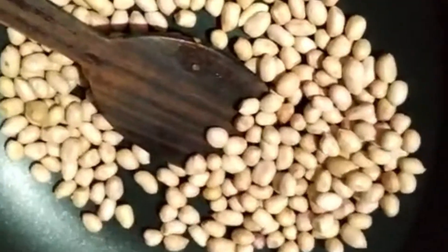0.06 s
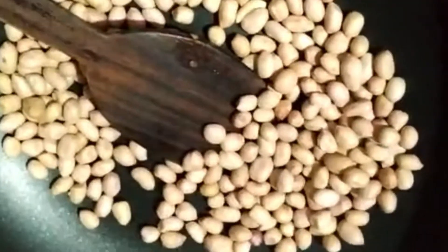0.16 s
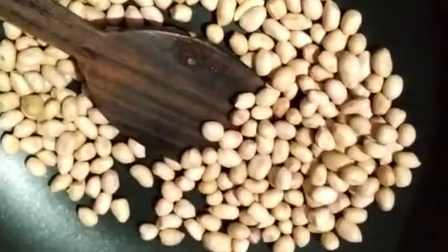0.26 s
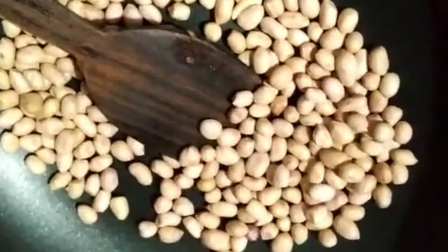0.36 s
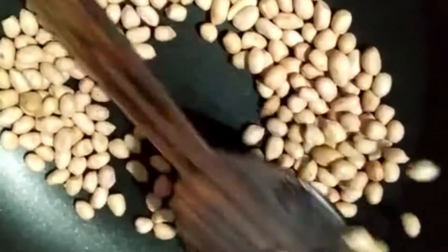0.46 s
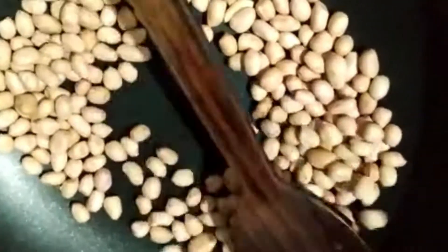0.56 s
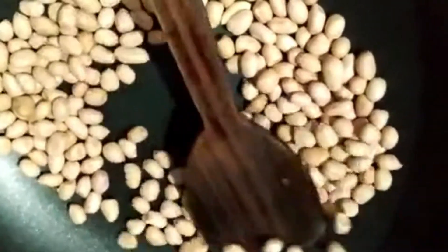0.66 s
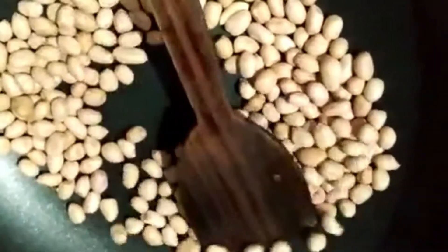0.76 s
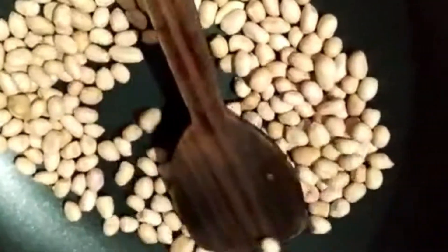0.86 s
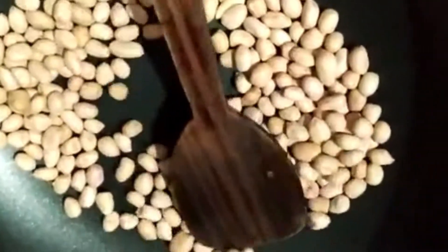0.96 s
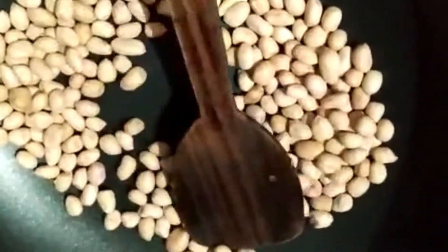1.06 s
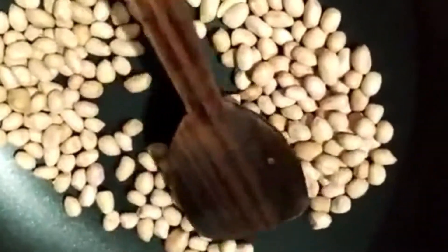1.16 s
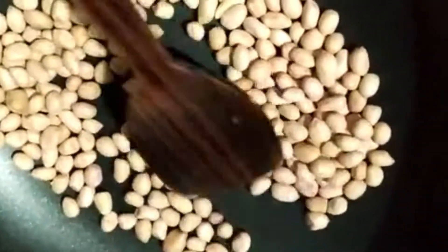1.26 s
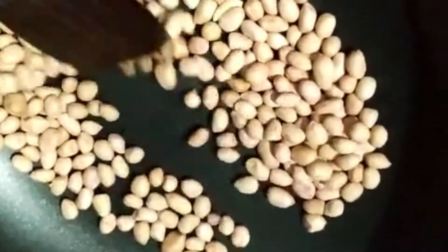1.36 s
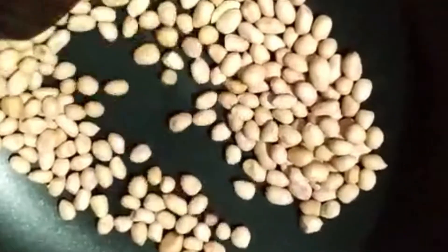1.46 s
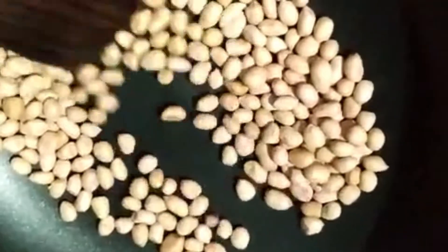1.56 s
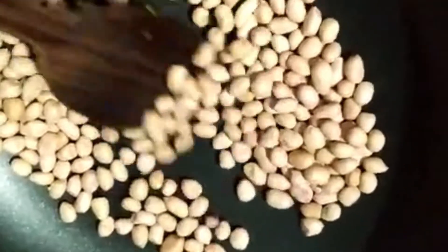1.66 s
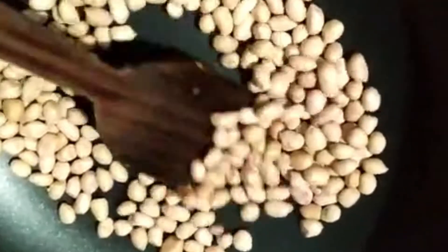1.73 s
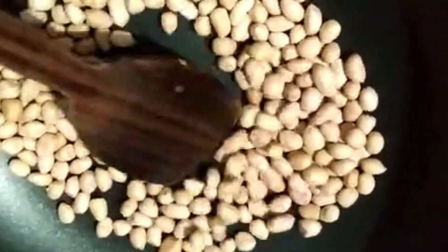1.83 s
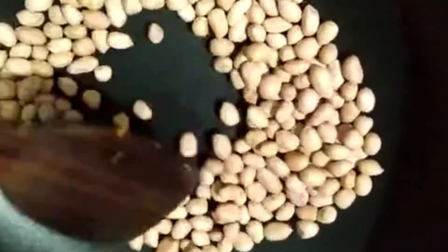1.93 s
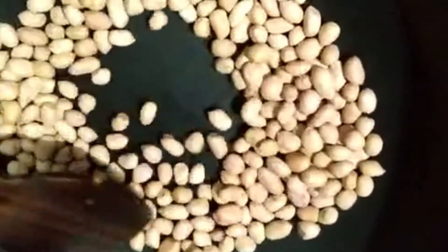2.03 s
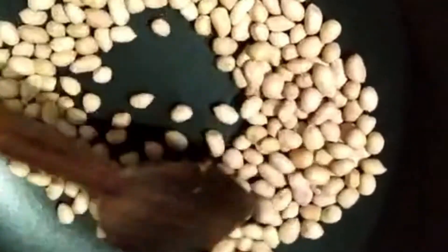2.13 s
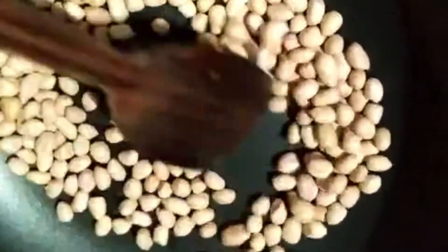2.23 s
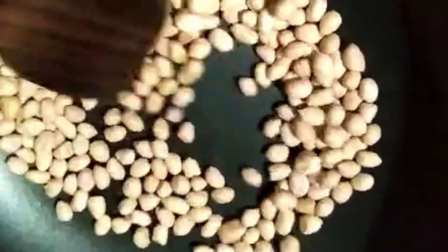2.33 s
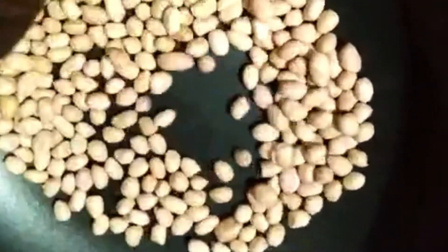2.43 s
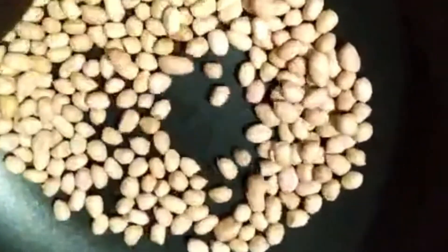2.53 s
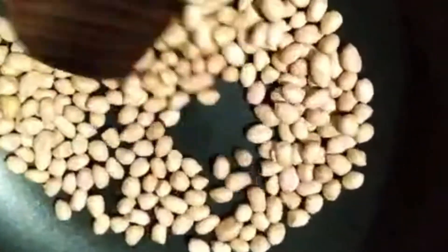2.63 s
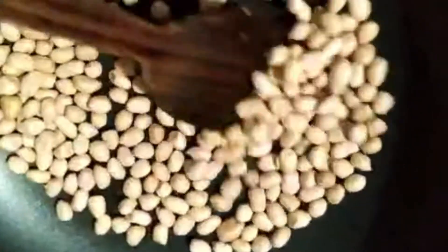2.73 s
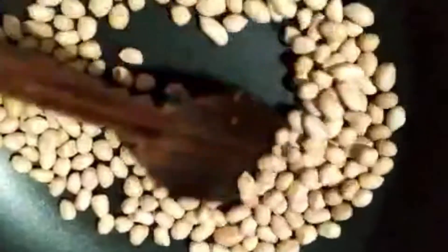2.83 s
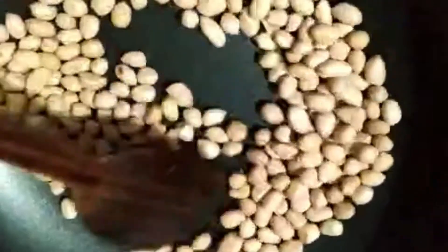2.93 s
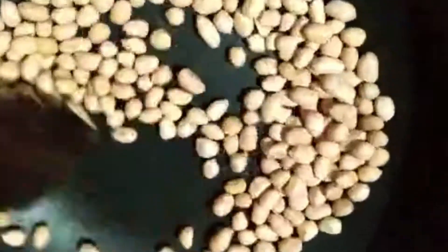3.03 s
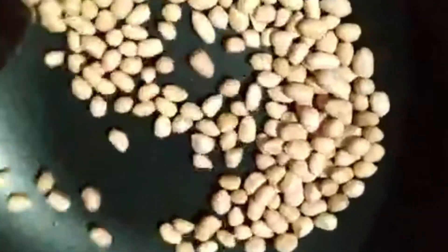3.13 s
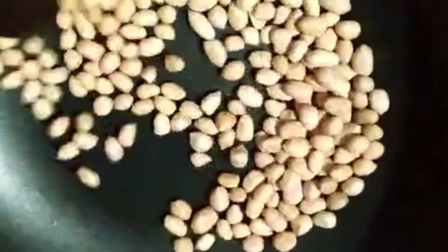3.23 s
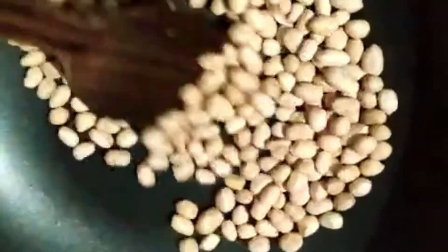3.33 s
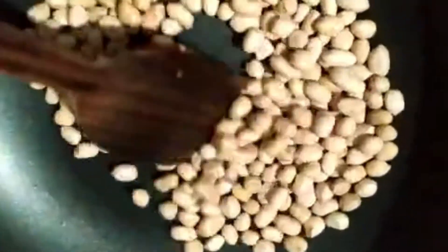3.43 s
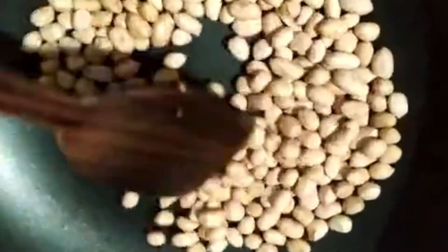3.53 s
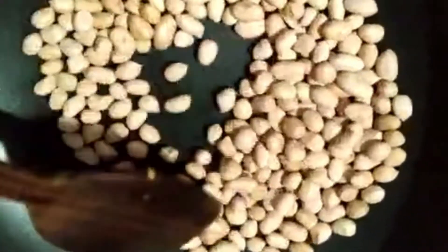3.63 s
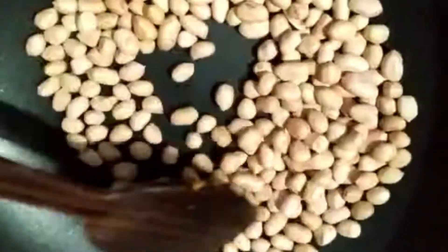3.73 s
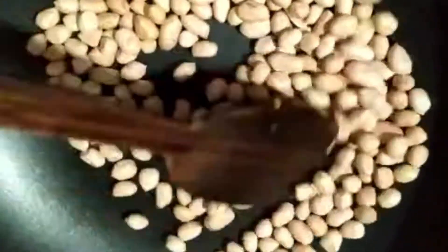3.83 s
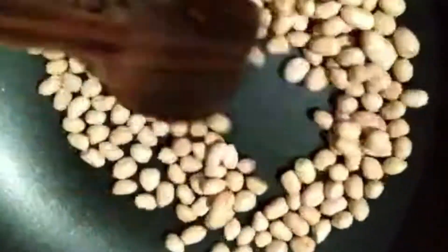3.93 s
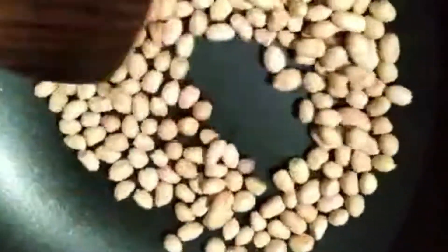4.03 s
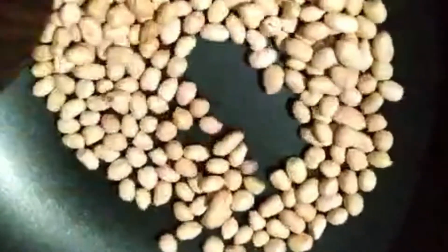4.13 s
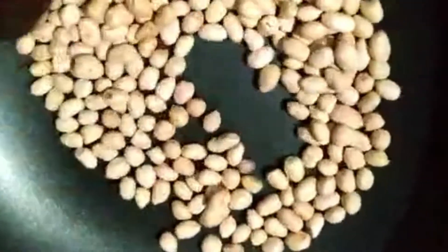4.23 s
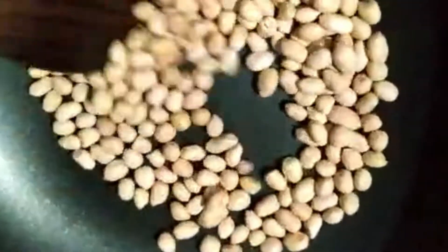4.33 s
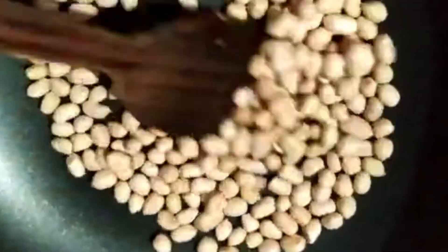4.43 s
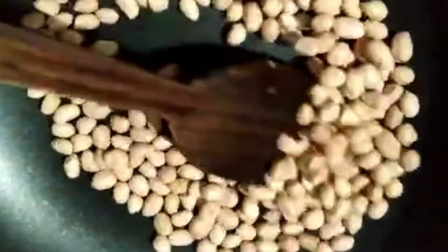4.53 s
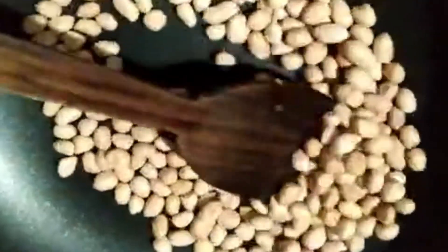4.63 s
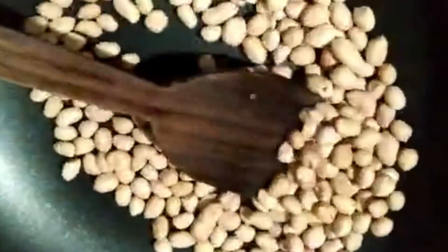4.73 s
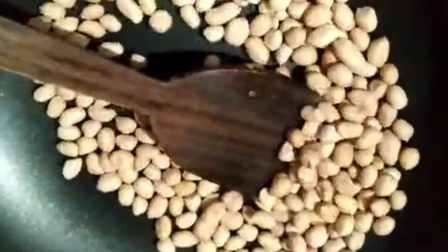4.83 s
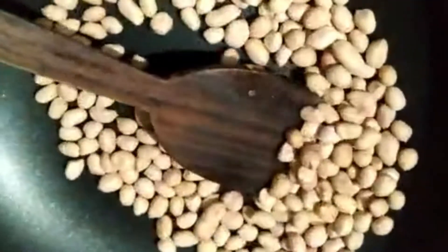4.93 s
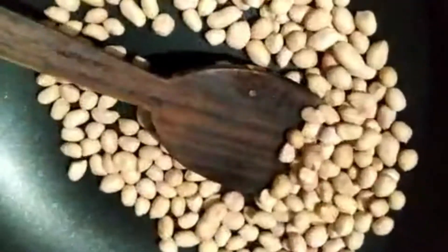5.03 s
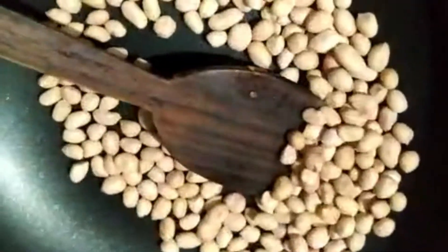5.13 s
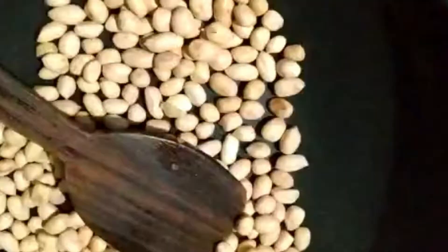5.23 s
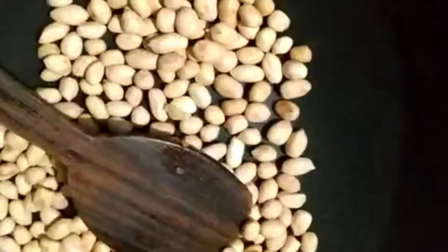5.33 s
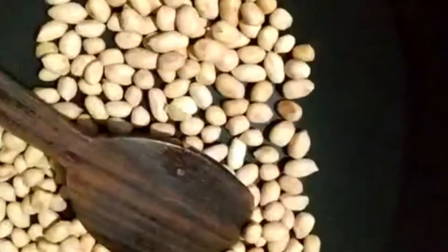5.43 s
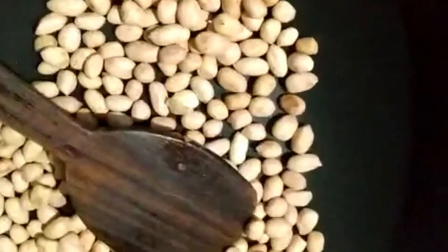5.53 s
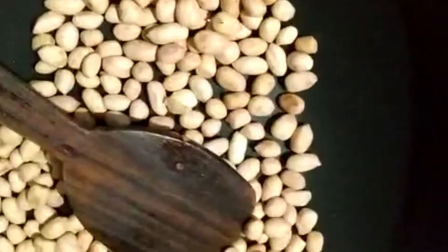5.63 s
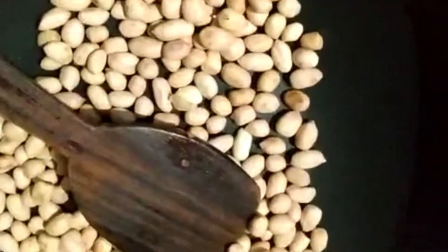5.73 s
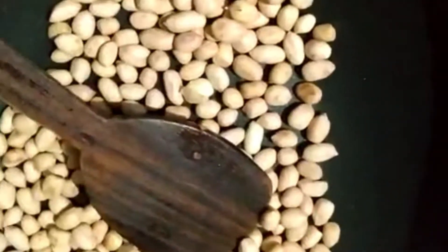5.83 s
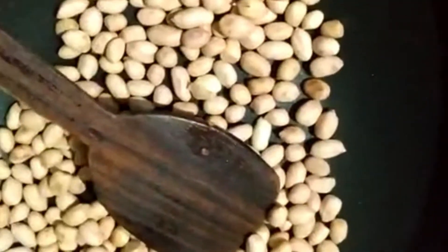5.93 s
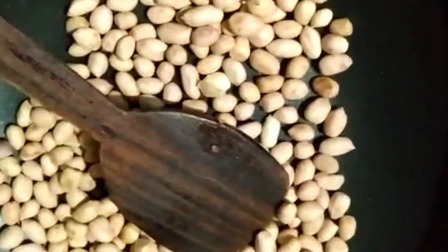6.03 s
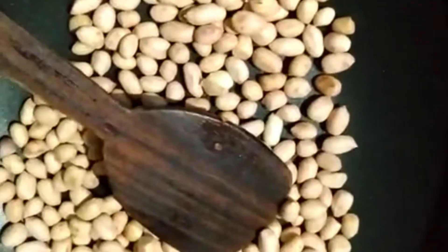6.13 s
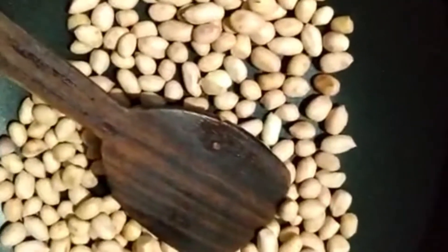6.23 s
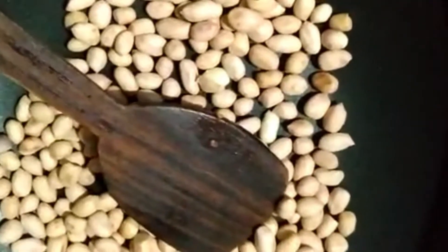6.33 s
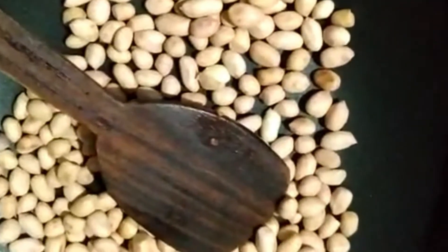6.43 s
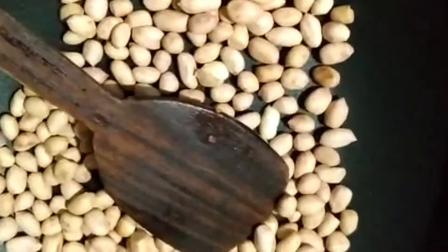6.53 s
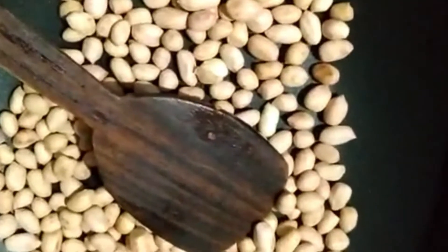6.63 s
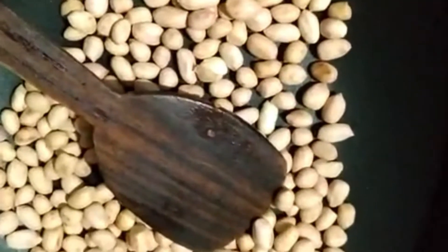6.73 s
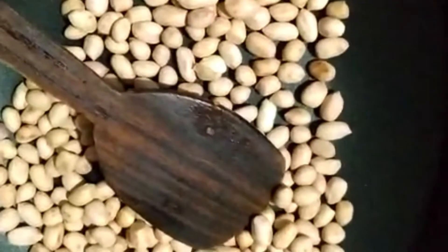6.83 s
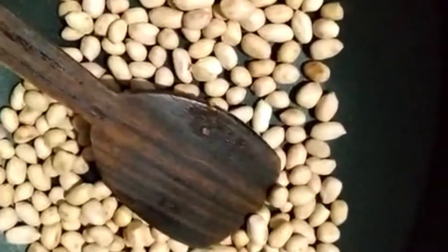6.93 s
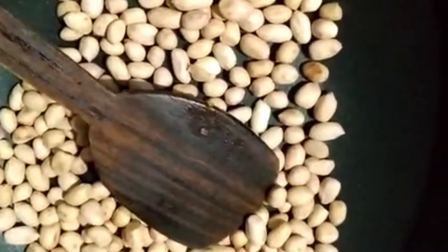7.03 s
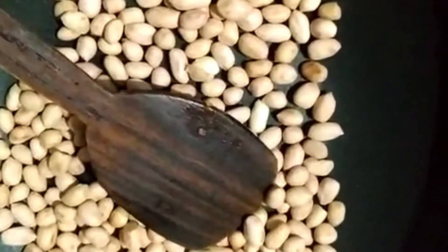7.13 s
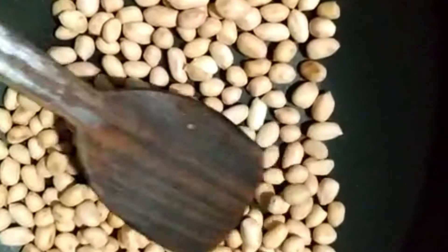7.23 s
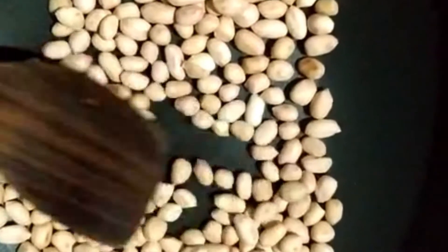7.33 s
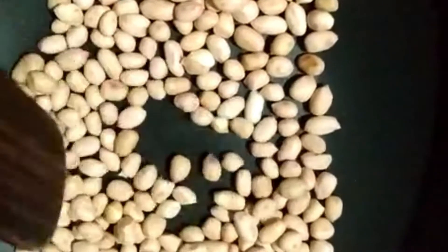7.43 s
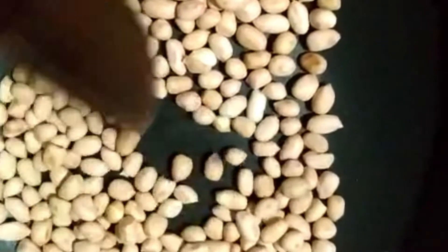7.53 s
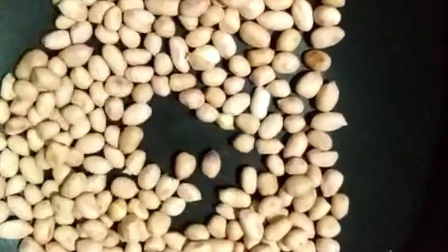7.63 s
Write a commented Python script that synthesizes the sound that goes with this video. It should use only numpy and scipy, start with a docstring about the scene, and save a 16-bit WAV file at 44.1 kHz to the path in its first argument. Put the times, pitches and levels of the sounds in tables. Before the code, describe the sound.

A wooden spatula scrapes and knocks around a dry pan, tumbling peanuts in uneven bursts, close up, with an appliance humming behind.

```python
"""Raw peanuts are stirred in a dry metal pan with a wooden spatula, heard from close above.
Rolling nuts tap the pan, which rings in short modes, and their hard shells click on each other.
Single nuts land and chatter; the spatula drags over the metal and knocks on it.
Tiled walls add a short tail. Behind it all an appliance hums over the kitchen's rumble and faint hiss."""
import sys
import numpy as np
from scipy import signal
from scipy.fft import rfft, irfft
from scipy.io import wavfile
from scipy.ndimage import uniform_filter1d

SR = 44100
rng = np.random.default_rng(int(sys.argv[2]) if len(sys.argv) > 2 else 0)


def file_out(sig):
    """Save sig as 16-bit WAV at sys.argv[1]."""
    # one column per channel
    cols = np.atleast_2d(sig).T
    # limit, then scale
    lim = np.clip(cols, -1, 1)
    pcm = np.round(lim * 32767).astype(np.int16)
    wavfile.write(sys.argv[1], SR, pcm)


N = 338699

# room tone of the kitchen: f/Hz, level/dB
ROOM_TONE = [(15, -32), (25, -6.5), (50, -10.5), (75, -21), (150, -22), (230, -27), (335, -16.5),
             (450, -25.5), (900, -28.5), (2500, -35), (3200, -42.5), (6500, -48.5), (11000, -46.5),
             (16000, -46.5)]
# its stereo width: f/Hz, side-to-mid ratio
ROOM_WIDTH = [(40, .25), (300, 0.49), (1500, 1), (8000, .9)]
# faint steady bands of hiss: f/Hz, width/Hz, level/dB
HISS_BANDS = [(7520, 880, -72), (10040, 400, -73.5)]
# deep bass swells as the pan is worked: t/s, rise/s, hold/s, fall/s, level/dB
BASS_SWELLS = [(0.12, -0.64, 0.16, -0.5, -38), (0.373, -2, .005, 0.2, -40.5),
               (1.346, 0.2, 0.0044, 0.6, -40), (1.89, -0.1, .005, 0.1, -40), (2.331, 0.06, 0.038, 0.6, -42),
               (4.047, 0.3, 0.051, 0.5, -43), (6.078, -2, .005, -1.5, -45), (6.309, 1, 0.0053, 1, -44),
               (7.376, -0.44, 0.082, .5, -42.5)]
# the blade scuffs the metal: t/s, hold/s, level/dB
BLADE_SCUFFS = [(0.174, 0.019, -34.5), (0.22, 0.025, -42), (0.291, 0.059, -33.5), (1.336, 0.0023, -36.5),
                (1.837, 0.055, -48.5), (2.276, 0.012, -41.5), (2.328, 0.019, -39), (2.412, 0.012, -41.5),
                (3.016, .01, -41), (4.03, 0.0088, -39.5), (4.116, 0.0086, -44), (7.393, 0.0083, -44),
                (7.491, 0.0041, -35.5)]
# the blade knocks on the pan: t/s, level/dB, f/Hz, edge click/dB
BLADE_KNOCKS = [(0.173, -6, 907, -41), (0.291, -11.5, 1220, -35), (.309, -12.5, 880, -43.5),
                (0.378, -20.5, 780, -18), (1.345, -9.5, 970, -7), (2.273, -25, 450, -52.5),
                (2.294, -44.5, 600, -31), (2.422, -12.5, 941, -18.5), (3.001, -11.5, 691, -45),
                (4.118, -11.5, 880, -32), (5.151, -40, 333, -70), (7.374, -27.5, 576.5, -28),
                (7.493, -6, 900.6, -8)]
# pan modes, damped by the nuts: f/Hz, width/Hz, level/dB, right minus left/dB, left phase lead/rad
PAN_MODES = [(873, 90, -13.5, -2, -0.4), (968, 69, -13.5, 2, -0.4), (1004.6, 66, -2.5, 3, -0.6),
             (1069.3, 52, -1.5, 3, -0.9), (1096, 250, -6.5, -0.5, 0), (1266, 61, -17.5, 1, 0.5),
             (1583.6, 40, -7, 8.5, 3), (2000, 70, -11.5, 0, 1.34), (2104, 38, -10.5, 0, 0.6),
             (2350, 90.2, -17, -10.5, -1.5), (2629, 70, -12.5, 8.5, 2.13), (2882, 52, -11, 1.5, -0.5),
             (3200, 23, -29, 8, 0.1), (3376, 43, -13, 2.5, 2), (3450, 50.6, -19.5, 1.5, -0.8),
             (3848, 54, -13.5, 1.5, 1.5), (4009, 50, -14.5, 0.5, 0.36), (4470, 66.8, -17.5, 2, 1.8),
             (4840, 60, -16.5, 12.5, 3), (5154, 30, -15.5, 4.5, -2.5), (5340, 43, -20, 0, -0.5),
             (5650, 110, -17, 10, 2.5), (5950, 60, -24.5, 3, 4.5), (6514, 45, -22.5, 3.5, -0.7),
             (6620, 54, -20, 7, 2.6), (7240, 66.9, -24.5, 1.5, -1.4), (7960, 65, -27, 3.5, -1.5),
             (8200, 45, -26, -0.5, 0), (8530, 46, -20.5, 3.5, -0.5), (9940, 250, -20.5, 4.5, -1)]
# modes of the wooden blade while it first digs in and damps the pan: columns as for the pan
BLADE_MODES = [(333, 25, 4.5, 0, 0), (536, 40, -5, 0, 0), (670, 33, -11, 0, 0), (897, 70, -4, 1.5, -0.49),
               (1173, 24, -6.5, 2.6, -0.39), (1840, 190, -10.5, 0.81, 0), (2270, 39, -15, 1.2, -0.027)]
# a small pan sends out little bass: f/Hz, gain/dB
PAN_RADIATION = [(200, -22.5), (500, -12.5), (750, 0.5), (900, 1.5), (16000, -2)]
# the heap slides off a spot and one mode rings out: t/s, length/s, f/Hz, gain/dB
FREED_MODES = [(.944, .012, 4450, 8.5), (1.155, 0.053, 3960, 9.5), (1.314, 0.03, 3920, 9.5),
               (1.375, .03, 3385, 9), (1.385, .06, 2360, 10), (1.42, .05, 1579, 5.5),
               (1.55, .035, 3960, 3.5), (2.02, .03, 1579, 8.5), (2.05, .02, 3385, 7.5),
               (2.213, .03, 2882, 4.5), (2.325, 0.022, 3870, 8), (2.64, .03, 2625, 4.5),
               (2.83, .055, 1579, 7), (2.921, 0.013, 3960, 14), (3.02, .06, 2107, 9),
               (3.047, .025, 3385, 9), (3.13, 0.025, 4000, 6), (3.165, 0.042, 3385, 2.5),
               (3.606, .025, 1579, 0), (4.1, .03, 2360, 7.5), (4.155, .02, 3385, 6), (4.19, .03, 1579, 7.5),
               (4.305, .03, 2882, 8.5), (4.434, .015, 3960, -2), (7.425, .045, 2107, 3.5),
               (7.49, .015, 8400, 14), (7.59, .04, 2882, 7.5)]
# body of a click: f/Hz, gain/dB
CLICK_TONE = [(700, -30), (1200, -11.5), (2000, -6), (4000, -12.5), (6000, -11), (8500, -10),
              (10000, -20.5), (12000, -37)]
# bright top of a click: f/Hz, gain/dB
SHEEN_TONE = [(7000, -47), (9000, 2.5), (10000, -5.5), (12000, -4.5), (15500, -8.5)]
# pushes of the spatula and the rolling that follows them:
# t/s, rise/s, hold/s, fall/s, dull ring/dB, upper ring/dB, shell clicks/dB, sheen/dB
STIR_STROKES = [(0.127, 0.05, 0.1, -0.01, -37.5, -41.5, -49, -42.5),
                (0.225, -0.0353, 0.035, 0.36, -33, -38, -26.5, -35),
                (0.296, -0.11, 0.011, 0.27, -28.5, -28, -29, -46),
                (0.383, 0, 0.0055, 0.16, -35, -38, -51, -50),
                (0.618, -0.3, 0.25, -0.03, -49, -53, -57, -56),
                (1.085, 0.19, 0.0043, 0.15, -29, -31, -40.5, -40),
                (1.192, -0.01, 0.0043, 0.2, -40.5, -38, -43.5, -48),
                (1.374, 0.0547, 0.06, 0.1345, -26.5, -27.5, -30, -29),
                (1.548, 0.32, 0.0049, 0.11, -37, -40.5, -45, -46),
                (1.706, -0.96, 0.0046, 0.1, -42, -44, -61.5, -54),
                (1.986, 0.27, 0.098, 0.28, -35.5, -35, -36.5, -40),
                (2.384, 0.37, 0.023, 0.5, -36, -39, -49.5, -57.5),
                (2.427, 0.014, 0.05, 0.06, -25.5, -26.5, -28, -24.5),
                (2.653, 0.34, 0.14, 0.45, -40, -36.5, -39, -41),
                (3.054, 0.07, 0.014, 0.1755, -23, -24, -29, -22.5),
                (3.127, 0.21, 0.1, 0.12, -38, -36.5, -43, -47.5),
                (3.46, 0.15, 0.11, 1, -46, -53, -50.5, -44),
                (3.687, 0.23, 0.05, 0.18, -32.5, -34.5, -41, -38.5),
                (4.072, 0.0957, .03, 0.0653, -34, -36, -43, -42),
                (4.122, 0.01, 0.057, 0.1324, -20.5, -26.5, -27.5, -29.5),
                (4.292, 0.7, 0.19, 0.23, -45, -43.5, -53, -52),
                (6.907, 1.1, 0.06, 0.5, -67, -67.5, -71.5, -72),
                (7.054, 0.09, 0.021, 0.11, -38.5, -50, -55.5, -52),
                (7.429, 0.03, 0.048, 0.06, -36, -42, -55.5, -46),
                (7.494, 0.02, 0.004, 0.12, -41, -34.5, -34, -40),
                (7.54, -0.0534, 0.064, 0.46, -34, -36.5, -40.5, -37)]
# single nuts or the blade's edge strike the pan: t/s, dull ring/dB, upper ring/dB, crack/dB, favoured f/Hz
SINGLE_TAPS = [(0.15, -18, -28, -38, 1560), (0.174, -14, -21.5, -19.5, 4420), (0.218, -23, -39, -27, 5130),
               (0.291, -6.5, -18, -16.5, 1900), (0.31, -7.5, -26, -40, 2290),
               (0.334, -13.5, -22, -23, 2280), (0.38, -26, -18, -16.5, 5700),
               (0.455, -44, -27.5, -55, 3400), (0.521, -37, -39, -34, 4870), (0.562, -28, -46, -44, 2110),
               (0.586, -35, -45, -38, 4010), (0.635, -24, -34.5, -54.5, 1580),
               (0.708, -33, -46.5, -49, 2650), (0.781, -29.5, -37, -59, 2140),
               (0.867, -36.5, -44, -52, 1630), (0.946, -40, -48, -38, 4530), (0.977, -45, -38.5, -43, 4000),
               (1.002, -36, -33.5, -36, 3980), (1.029, -28, -27.5, -38, 2610), (1.043, -27, -35, -47, 2100),
               (1.064, -18.5, -25.5, -36, 2830), (1.086, -22, -17, -22, 3410), (1.105, -25, -25, -32, 2860),
               (1.159, -25, -32.5, -41, 2090), (1.205, -28.5, -41, -43, 4040), (1.248, -41, -40, -43, 4030),
               (1.312, -29, -22, -30.5, 4080), (1.344, -8.5, -17, -12, 3960),
               (1.393, -15, -25, -25.5, 3320), (1.417, -10, -34, -24.5, 4880), (1.437, -19, -33, -39, 1580),
               (1.459, -19, -41, -34, 1570), (1.514, -35, -34, -36, 1580), (1.544, -34, -27, -31, 3970),
               (1.561, -30, -27.5, -33.5, 3970), (1.584, -30, -37, -36, 1580),
               (1.626, -27, -36.5, -44, 2090), (1.656, -22, -32.5, -33, 2080),
               (1.687, -27, -32.5, -34, 2100), (1.696, -22.5, -35, -34, 1600), (1.721, -29, -35, -48, 2080),
               (1.769, -36, -35, -39.5, 2630), (1.894, -47, -33.5, -44, 2630), (1.922, -43, -38, -41, 3850),
               (1.972, -29, -27.5, -31, 1959), (1.983, -25, -28, -27, 2040), (2.066, -17.5, -31, -37, 3300),
               (2.101, -24, -31.5, -40, 1571), (2.122, -22, -36, -54, 1580), (2.189, -30, -43, -53, 2110),
               (2.213, -44, -35, -43, 2880), (2.227, -31, -33.5, -46, 2800),
               (2.271, -41, -36.5, -43.5, 2900), (2.293, -43, -45, -30.5, 2170),
               (2.325, -28, -28.5, -35, 3880), (2.351, -27, -35, -34, 3880), (2.402, -18, -26, -41, 2060),
               (2.422, -4, -12.5, -16, 2840), (2.604, -37, -37, -33, 2026),
               (2.637, -30, -25.5, -43.5, 1581), (2.654, -36, -24, -46, 2570),
               (2.694, -28, -29.5, -51, 1579), (2.738, -25.5, -30, -50, 1570),
               (2.758, -21.5, -23, -43, 1600), (2.772, -25.5, -28, -34.5, 1570),
               (2.834, -32, -39, -41, 1580), (2.857, -40, -37, -46, 1560), (2.869, -33, -40, -42, 1580),
               (2.924, -36, -26, -36, 1535), (2.965, -28, -34.5, -34, 1530), (2.99, -25, -32, -41, 2900),
               (3.001, -25, -34, -40, 1570), (3.025, -13, -43, -32, 2037), (3.036, -12.5, -32, -34, 2092),
               (3.046, -19, -27, -27, 2050), (3.059, -15, -23, -15.5, 2120), (3.13, -29, -29, -38, 1570),
               (3.163, -24, -26, -43, 3420), (3.198, -21.5, -26.5, -43.5, 2060),
               (3.231, -24, -38, -42, 1540), (3.237, -20, -30, -44, 1600), (3.27, -24, -30.5, -46, 1590),
               (3.311, -24, -28, -48, 1607), (3.336, -28.5, -35, -53, 2100), (3.363, -33, -48, -65, 2100),
               (3.405, -34.5, -35, -58, 2136), (3.428, -36.5, -42, -57, 2100),
               (3.508, -30, -37.5, -41, 2103), (3.56, -33.5, -34, -53, 2060), (3.641, -33, -30, -41, 1620),
               (3.681, -23, -23, -33, 1610), (3.738, -22.5, -26, -33.5, 1539),
               (3.787, -28.5, -35, -48, 1580), (3.829, -29, -42, -47, 2090),
               (3.857, -32.5, -36.5, -42, 2110), (3.972, -36, -31.5, -31, 5554),
               (4.022, -44, -37, -36.5, 2048), (4.073, -28, -25.5, -40, 2070),
               (4.083, -31, -25.5, -33, 3880), (4.118, -7, -15, -29, 2376), (4.154, -8, -22, -27, 3341),
               (4.187, -20, -29.5, -24.5, 1560), (4.265, -29, -28, -38, 2080),
               (4.285, -22.5, -33, -42, 1542), (4.317, -27, -26.5, -39, 2150),
               (4.326, -31, -24.5, -39, 3026), (4.348, -34, -32, -46, 1580), (4.43, -30, -25, -33, 1600),
               (4.462, -32, -39, -52, 2082), (4.478, -25, -29, -40, 1590), (4.51, -32, -35, -52, 2130),
               (4.53, -35.5, -40, -55, 1590), (5.022, -41.5, -50.5, -60, 2630),
               (6.851, -52.5, -50, -62, 2065), (6.866, -46, -47.5, -62, 2086), (6.889, -49, -55, -65, 2160),
               (6.931, -49, -52, -67, 1560), (7.016, -35, -54, -55, 1460), (7.058, -26, -45, -54, 1610),
               (7.094, -29, -46.5, -59, 1590), (7.127, -37, -61, -68, 1610),
               (7.374, -37.5, -42, -35.5, 2070), (7.427, -31, -32, -43, 2090),
               (7.457, -16.5, -23, -32.5, 2050), (7.493, -5, -22, -14.5, 2059),
               (7.572, -14.5, -28, -41, 1582), (7.596, -24, -29, -31, 2937), (7.613, -25, -35.5, -42, 2102),
               (7.637, -24, -39, -44, 1571), (7.66, -29, -47, -44, 1551)]
# tone of the rumble, the wall tail and the dragging blade: f/Hz, gain/dB
RUMBLE_TONE = [(20, -23), (45, 7.5), (80, -3), (150, -12), (300, -46)]
WALL_TONE = [(300, 2), (3000, .5), (12000, 5)]
DRAG_TONE = [(120, -2), (220, .5), (330, -2.5), (600, -1.5), (900, -26.5)]
# how dull ring, upper ring, clicks and sheen follow a stroke: rise steepness, hold share, fall steepness
STROKE_RESPONSE = [(1.514, .88, 1.27), (1, .8, 1), (.98, .51, 1.4), (.98, .68, 5.5)]

ROOM_DB, RUMBLE_DB, HUM_DB, HUM_HZ = -55, -58.5, -48, 183.3
DRAG_REST_DB, DRAG_PER_DB = -61.5, .2765  # drag with the heap at rest; its rise per dB of rolling
KNOCK_T60_S, EDGE_LAG_S = .03, .0004
PRESSED_UNTIL_S, PRESS_DULL_DB, PRESS_UPPER_DB = .5, -19, -3.5  # the pressed blade mutes the pan
FAVOUR_DB, FAVOUR_WIDTH = 9, .03  # boost of a favoured mode; its reach as a share of pitch
MODE_DRIFT = .0042  # share by which the weight of the nuts moves each mode
CLUMP_DB, LAYER_CLUMP_DB = 1.5, 1.3  # nuts tumble in clumps, some dull and some bright
ALL_ROLL_DB = -34  # upper ring at which every nut rolls
BOUNCE_GAP_S, BOUNCE_DB = .005, -4.5  # mean gap and level step per bounce
BLADE_FROM_DB, BLADE_LOSS_PER_DB = -16, .6  # a louder blow is the blade, which hardly bounces


def undb(db):
    """Decibels to amplitude."""
    return 10 ** (np.asarray(db) / 20)


def unit(x):
    """Scale to rms 1."""
    return x / np.sqrt(np.mean(x ** 2))


def on_log(points, hz):
    """Read an (f/Hz, value) table on a log-frequency axis."""
    f, v = np.transpose(points)
    return np.interp(np.log(np.maximum(hz, 1)), np.log(f), v)


def colour(x, points):
    """EQ the last axis with (f/Hz, gain/dB) points."""
    size = x.shape[-1]
    return irfft(rfft(x) * undb(on_log(points, np.arange(size // 2 + 1) * SR / size)), size)


def ring(x, hz, width_hz, rise_hz):
    """One decaying complex mode; a second, wider pole softens its attack, as a springy contact does."""
    poles = np.exp((2j * np.pi * hz - np.pi * np.array([width_hz, rise_hz])) / SR)
    return signal.lfilter([1 - abs(poles[1])], np.poly(poles), x)


def wander(rate_hz):
    """Smooth random modulation at rms 1: held steps, slewed twice."""
    hold = int(SR / rate_hz)
    steps = np.repeat(rng.standard_normal(N // hold + 1), hold)
    return unit(uniform_filter1d(uniform_filter1d(steps, hold), hold)[:N])


def burst(t60_s):
    """Noise that dies away, partly different on each side."""
    t = np.arange(SR // 2) / SR
    noise = rng.standard_normal((3, len(t)))
    decay = np.exp(-np.log(1000) * t / t60_s)
    return (noise[0] + .91 * noise[1:]) * decay / np.sqrt(np.sum(decay ** 2))


def swell(peak_s, rise_s, hold_s, fall_s, db, response=(1, 1, 1)):
    """Envelope in dB of swells summed as powers; rise and fall are times per 20 dB, floored at 3 ms."""
    t = np.arange(N * 1000 // SR + 2)[:, None] / 1000
    up = response[0] * np.maximum(peak_s - t, 0) / np.maximum(rise_s, .003)
    release_s = peak_s + response[1] * np.maximum(hold_s, 0)
    down = response[2] * np.maximum(t - release_s, 0) / np.maximum(fall_s, .003)
    power = np.sum(undb(np.maximum(db - 20 * (up + down), -150)) ** 2, axis=1)
    return np.interp(np.arange(N) / SR, t[:, 0], 10 * np.log10(power))


def room_tone():
    """The kitchen's noise bed, narrow in the bass and wide on top, with two faint bands of hiss."""
    mid, side = colour(rng.standard_normal((2, N)), ROOM_TONE)
    side = irfft(rfft(side) * on_log(ROOM_WIDTH, np.arange(N // 2 + 1) * SR / N), N)
    air = undb(ROOM_DB) * (mid + side * np.array([[1], [-1]])) / np.std(mid)
    for hz, width_hz, db in HISS_BANDS:
        band = ring(rng.standard_normal((2, N)), hz, width_hz, 1.4 * width_hz)
        air += undb(db) * unit(band.imag)
    return air


def rumble():
    """Deep, nearly centred noise that swells as the pan is worked."""
    mid, side = colour(rng.standard_normal((2, N)), RUMBLE_TONE)
    gain = np.hypot(undb(RUMBLE_DB + wander(3)), undb(swell(*np.transpose(BASS_SWELLS))))
    return unit(mid + .28 * side * np.array([[1], [-1]])) * gain


def appliance_hum():
    """One low tone that wavers slightly in pitch and level."""
    phase = 2 * np.pi * np.cumsum(HUM_HZ + 1.2 * wander(16)) / SR
    level_db = HUM_DB + .5 * wander(4.9) + 2 * wander(22)
    return np.sqrt(2) * undb(level_db) * np.sin(phase) * undb([[-.6], [.6]])


def wall_tail(direct):
    """Tiled walls return a short, diffuse tail."""
    tail = signal.fftconvolve(direct.mean(axis=0)[None], burst(t60_s=.27), axes=1)[:, :N]
    return colour(tail, WALL_TONE)


def spatula_drag():
    """Wood drags over metal: dull, grainy noise that follows the strokes and flares at scuffs."""
    grain = rng.standard_normal(N) * undb(3.2 * wander(60))
    rolling_db = np.maximum(swell(*np.transpose(STIR_STROKES)[:5]) + 70, 0)
    peak_s, hold_s, db = np.transpose(BLADE_SCUFFS)
    scuff_db = swell(peak_s, rise_s=.02, hold_s=hold_s, fall_s=.038, db=db)
    gain = np.hypot(undb(DRAG_REST_DB + DRAG_PER_DB * rolling_db), undb(scuff_db))
    return unit(colour(grain, DRAG_TONE)) * gain * undb([[-.3], [.3]])


def spatula_knocks():
    """A soft push into one short wooden mode, with the crack of wood on metal and a thin edge click."""
    body = np.zeros(N)
    t = np.arange(SR // 4) / SR
    envelope = np.exp(-np.log(1000) * t / KNOCK_T60_S) * (1 - np.exp(-t / .00017))
    for start_s, db, hz, _ in BLADE_KNOCKS:
        knock = np.sin(2 * np.pi * hz * t) * envelope
        i = int(start_s * SR)
        body[i:i + len(t)] += undb(db) * knock[:N - i]
    start_s, knock_db, _, edge_db = np.transpose(BLADE_KNOCKS)
    edge = clicks(((start_s + EDGE_LAG_S) * SR).astype(int), edge_db + 25, SHEEN_TONE, .04)
    crack = clicks((start_s * SR).astype(int), knock_db + 3, CLICK_TONE, .012)
    return body * undb([[-.5], [.5]]) + edge + crack


def clicks(at, level_db, tone, decay_s, places=6):
    """Short broadband cracks of hard contacts, smeared by the heap; each place has its own colour."""
    blows = np.zeros((places, 1, N))
    np.add.at(blows, (rng.integers(0, places, len(at)), 0, at), undb(level_db))
    bands_hz = np.geomspace(1000, 16000, 24)
    place_db = 5 * rng.standard_normal((places, 24)) - 1
    tails = np.array([colour(burst(decay_s)[:, :SR // 5], list(zip(bands_hz, db))) for db in place_db])
    tails *= np.exp(-np.arange(SR // 5) / SR / decay_s)
    return colour(signal.oaconvolve(blows, tails, axes=2)[:, :, :N].sum(axis=0), tone)


def pan_ring(at, dull_db, upper_db, treble_db, favoured_hz, spot_db, smear_rad, spread, shift_db):
    """Each tap's spot wakes the modes differently; the shifting heap mutes, frees and detunes them."""
    out, tap_s = np.zeros((2, N)), at / SR
    pressed = tap_s < PRESSED_UNTIL_S
    for mode in PAN_MODES + BLADE_MODES:
        hz, width_hz, mode_db, lean_db, lead_rad = mode
        level_db = dull_db if hz < 1400 else upper_db if hz < 4400 else treble_db
        if mode in BLADE_MODES:
            level_db = np.where(pressed, level_db, -200)
        else:
            level_db = level_db + pressed * (PRESS_DULL_DB if hz < 1400 else PRESS_UPPER_DB * (hz < 5000))
        level_db += FAVOUR_DB * np.exp(-((favoured_hz / hz - 1) / FAVOUR_WIDTH) ** 2)
        for start_s, length_s, free_hz, free_db in FREED_MODES:
            outside_s = np.maximum(np.abs(tap_s - start_s - length_s / 2) - length_s / 2, 0)
            level_db += free_db * np.exp(-(outside_s / .01) ** 2 - ((free_hz / hz - 1) / FAVOUR_WIDTH) ** 2)
        spot, lag, position = rng.standard_normal((len(at), 3)).T
        size = undb(level_db + mode_db + spot_db * spot + shift_db * wander(14)[at]) * np.sqrt(width_hz)
        size = size * np.exp(1j * smear_rad * lag)  # the bending wave reaches the rim later for some modes
        blows = np.zeros((2, N), complex)
        np.add.at(blows[0], at, size)
        np.add.at(blows[1], at, size * spread * min(hz / 3000, 1) * position)
        drift = np.exp(2j * np.pi * np.cumsum(MODE_DRIFT * hz * wander(5)) / SR)
        mid, side = drift * ring(blows / drift, hz, width_hz, 1.7 * hz + 340)
        out[0] += undb(-lean_db / 2) * np.imag((mid + side) * np.exp(.5j * lead_rad))
        out[1] += undb(lean_db / 2) * np.imag((mid - side) * np.exp(-.5j * lead_rad))
    return colour(out, PAN_RADIATION)


def tumble(full_rate_hz=1500):
    """Strokes set nuts tumbling at random: each contact's sample index and its four layer levels."""
    columns = np.transpose(STIR_STROKES)
    timing, peaks_db = columns[:4], columns[4:]
    layers_db = np.array([swell(*timing, db, response) for db, response in zip(peaks_db, STROKE_RESPONSE)])
    gap, force, luck = rng.random((13000, 3)).T
    at = (np.cumsum(-np.log(1 - gap)) / full_rate_hz * SR).astype(int)
    at = np.minimum(at, N - 1)
    moving_share = np.clip(undb(layers_db[1, at] - ALL_ROLL_DB), .5, 1)  # a gentle stir moves fewer nuts
    rolls = (at < N - 1) & (luck < moving_share)
    at = at[rolls]
    size_db = np.minimum(-2.5 * np.log(1 - force[rolls]), 6)  # most taps are light, a few land hard
    size_db += CLUMP_DB * wander(25)[at] - 10 * np.log10(full_rate_hz * moving_share[rolls])
    layers_db += LAYER_CLUMP_DB * np.array([wander(40) for _ in layers_db])
    return at, layers_db[:, at] + size_db


def rolling_nuts():
    """The rolling heap: a dense patter rings the pan while shells click on each other."""
    at, (dull_db, upper_db, click_db, sheen_db) = tumble()
    metal = pan_ring(at, dull_db + 3.5, upper_db + 5.5, click_db + 10, favoured_hz=0,
                     spot_db=3, smear_rad=2.49, spread=.76, shift_db=2)
    # shell clicks scatter more in size than the pan's ring
    crisp_db = 3 * (np.minimum(rng.exponential(size=len(at)), 4) - 1.5)
    shells = clicks(at, click_db + crisp_db + 47, CLICK_TONE, .034)
    sheen = clicks(at, sheen_db + crisp_db + 41.5, SHEEN_TONE, .02714)
    return metal + shells + sheen


def bounces(contacts=3):
    """A landing nut chatters: the tap columns, each tap followed by its weaker bounces."""
    tap_s, dull_db, upper_db, crack_db, favoured_hz = np.transpose(SINGLE_TAPS)[:, :, None]
    gaps_s = BOUNCE_GAP_S * (.5 + rng.random((len(tap_s), contacts)))
    delay_s = np.cumsum(gaps_s, axis=1) - gaps_s[:, :1]
    step_db = BOUNCE_DB - BLADE_LOSS_PER_DB * np.maximum(dull_db - BLADE_FROM_DB, 0)
    fade_db = step_db * np.arange(contacts)
    columns = (tap_s + delay_s, dull_db + fade_db, upper_db + fade_db, crack_db + 2 * fade_db,
               np.repeat(favoured_hz, contacts))
    return [column.ravel() for column in columns]


def landing_nuts():
    """Single nuts or the blade's edge hit the pan: a sharp tick of contact, a crack and a short ring."""
    tap_s, dull_db, upper_db, crack_db, favoured_hz = bounces()
    at = (tap_s * SR).astype(int)
    metal = pan_ring(at, dull_db - 23.5, upper_db - 16, crack_db - 9.5, favoured_hz,
                     spot_db=1.8, smear_rad=1.1, spread=.53, shift_db=.78)
    crack = clicks(at, crack_db + 31.5, CLICK_TONE, .075)
    sheen = clicks(at, crack_db + 17.5, SHEEN_TONE, .04795)
    tick = clicks(at, upper_db + 15, CLICK_TONE, .014)
    return metal + crack + sheen + tick


def scene():
    """Nuts and spatula up front, their tail off the walls, and the kitchen bed behind."""
    direct = rolling_nuts() + landing_nuts() + undb(-2.5) * spatula_knocks() + spatula_drag()
    return direct + undb(-13) * wall_tail(direct) + room_tone() + rumble() + appliance_hum()


def record(dry):
    """Soft clipping rounds the loudest peaks and a steep low-pass cuts the top."""
    lowpass = signal.ellip(10, .2, 80, 15900, fs=SR, output="sos")
    return signal.sosfilt(lowpass, .95 * np.tanh(dry / .95))


dry = scene()
out = record(dry)
file_out(out)
```